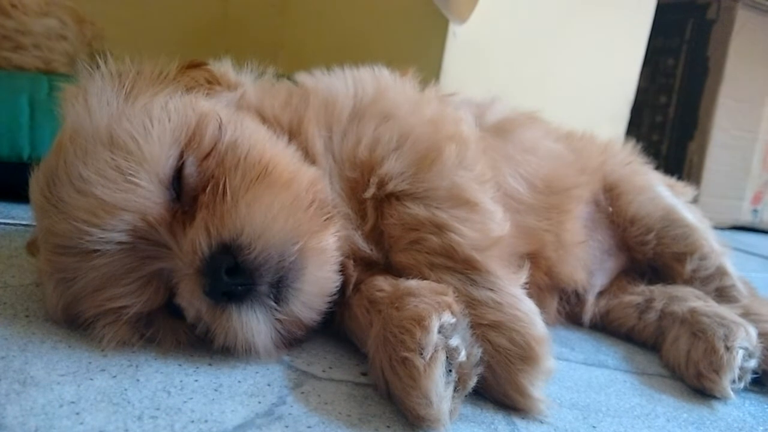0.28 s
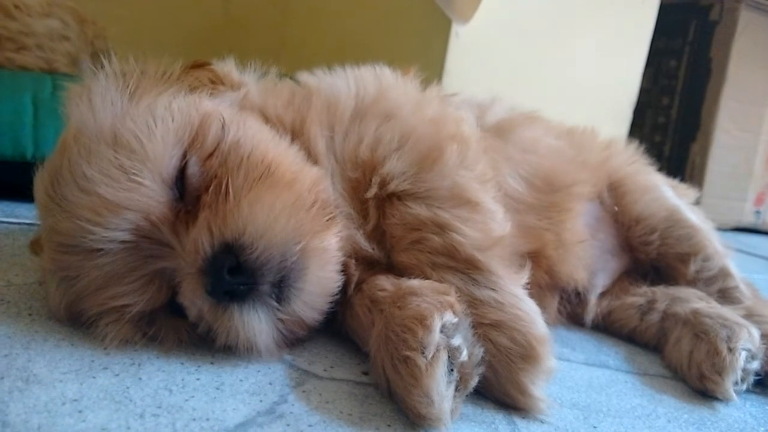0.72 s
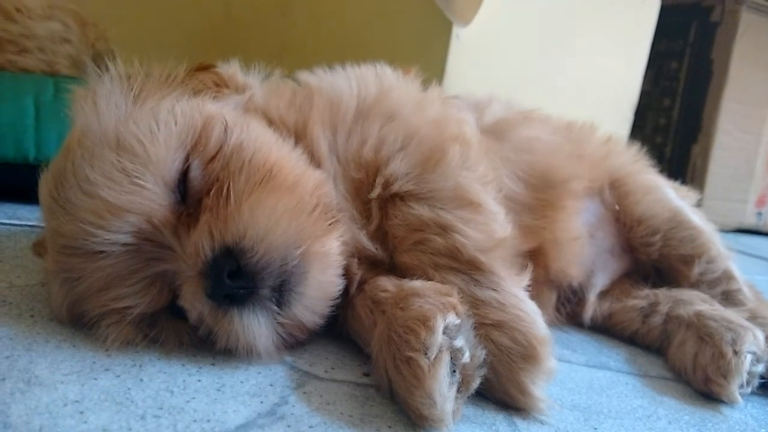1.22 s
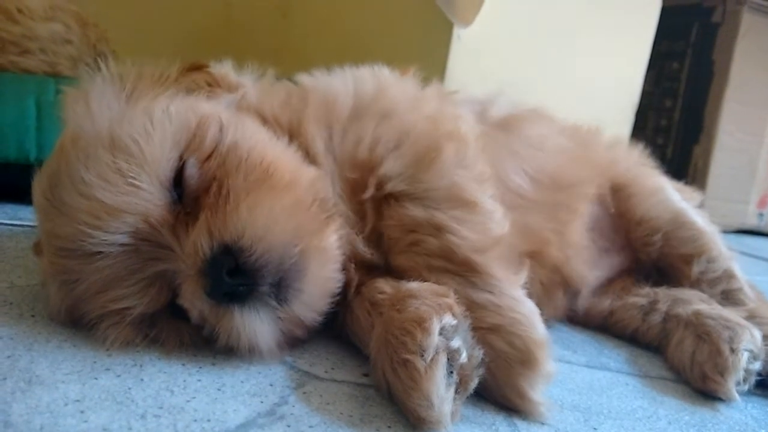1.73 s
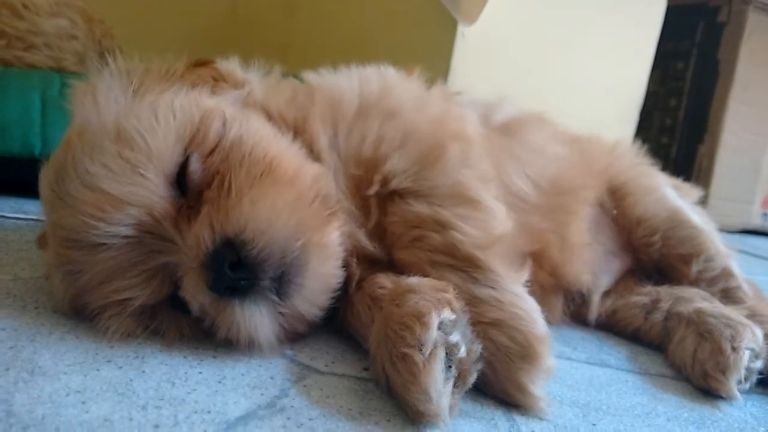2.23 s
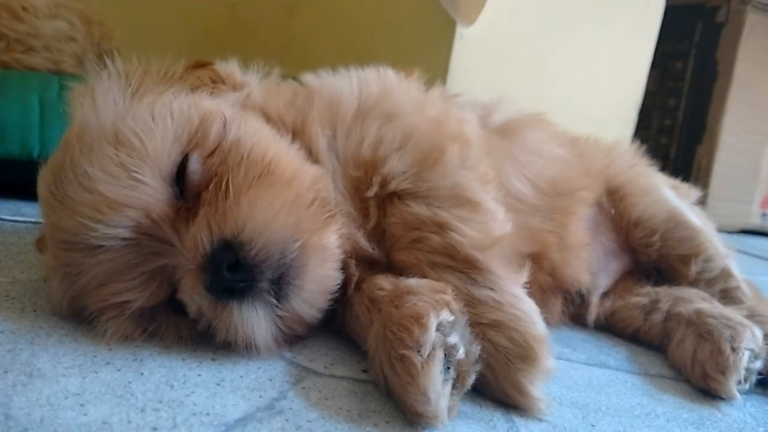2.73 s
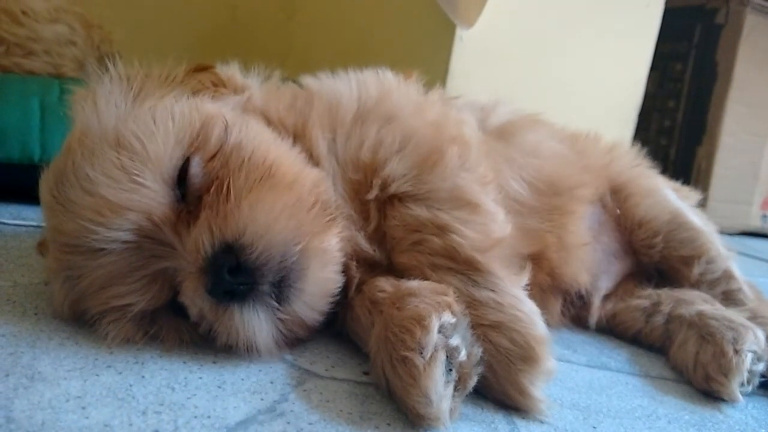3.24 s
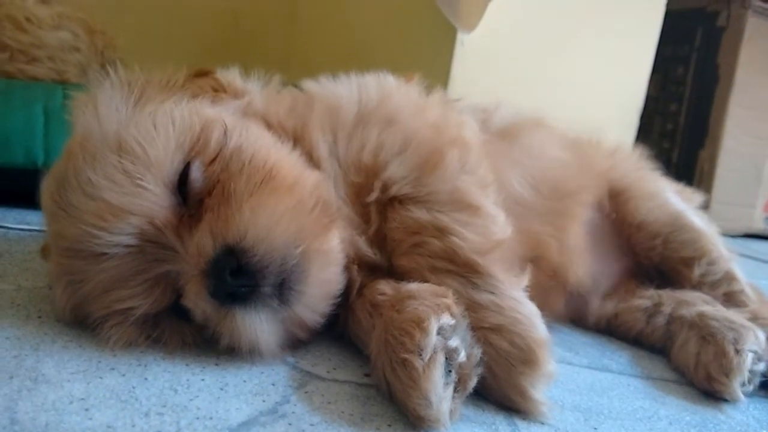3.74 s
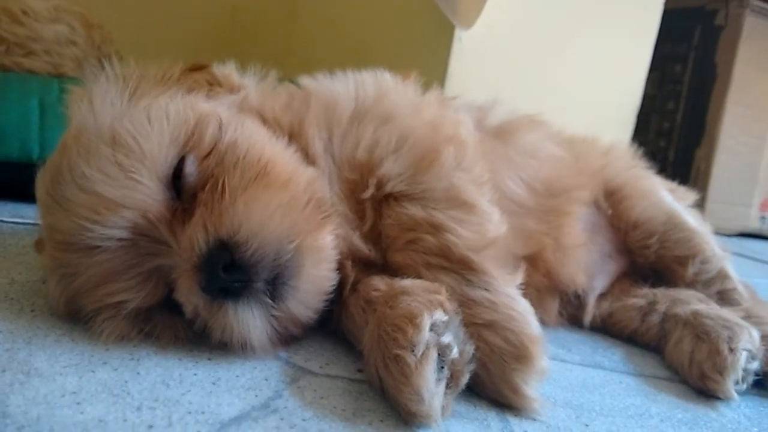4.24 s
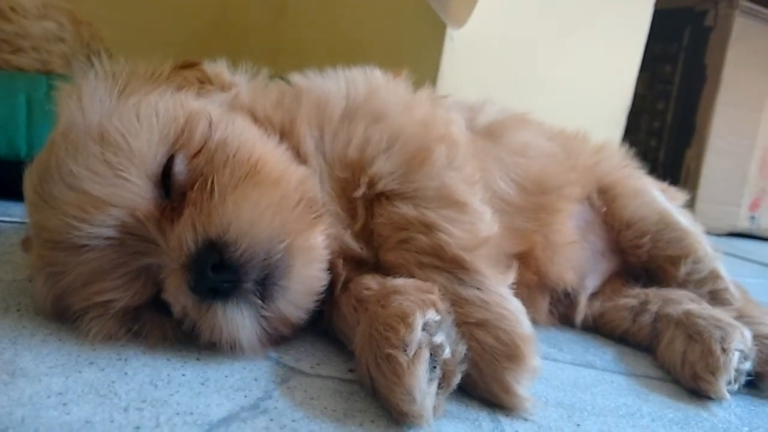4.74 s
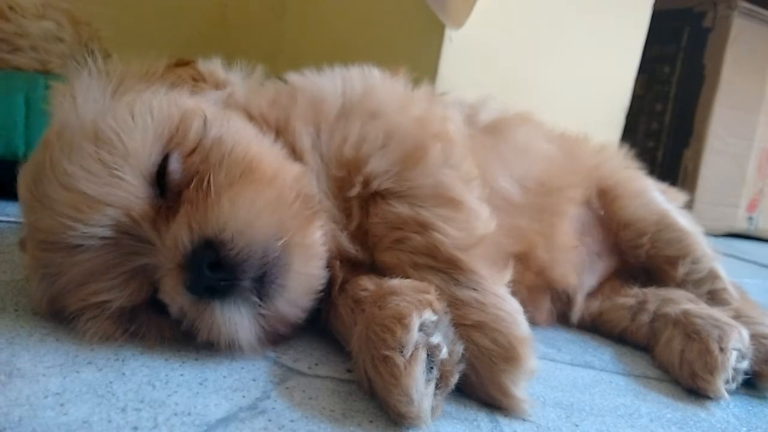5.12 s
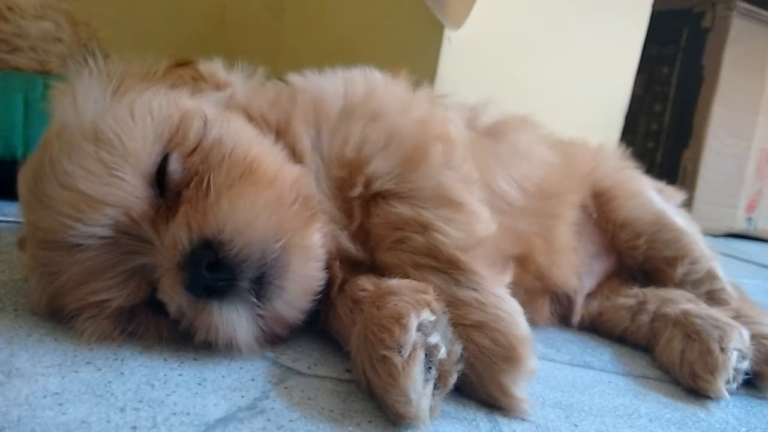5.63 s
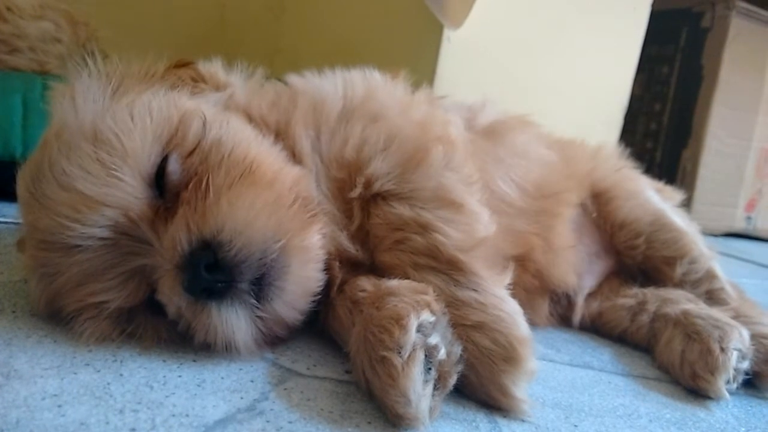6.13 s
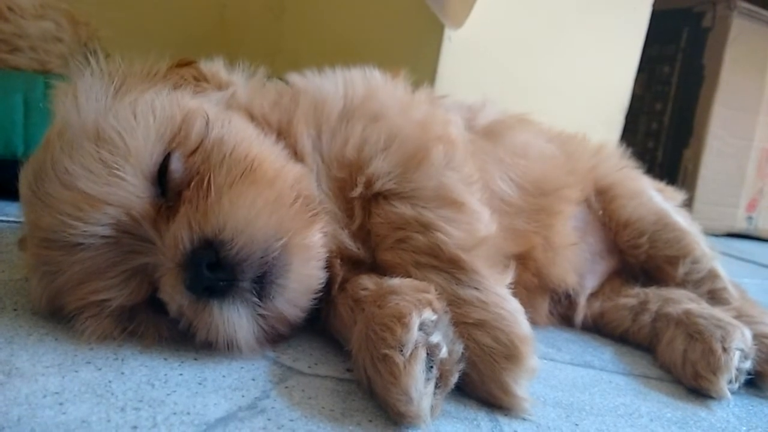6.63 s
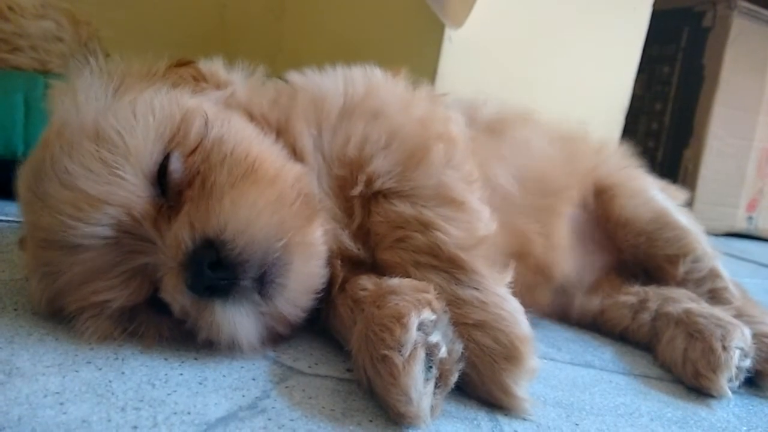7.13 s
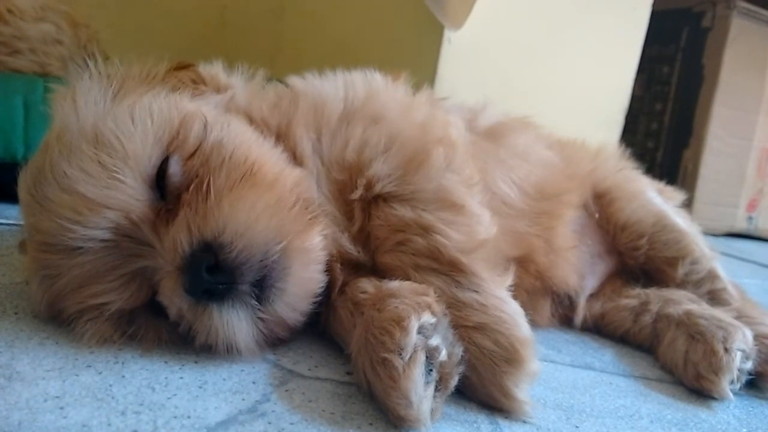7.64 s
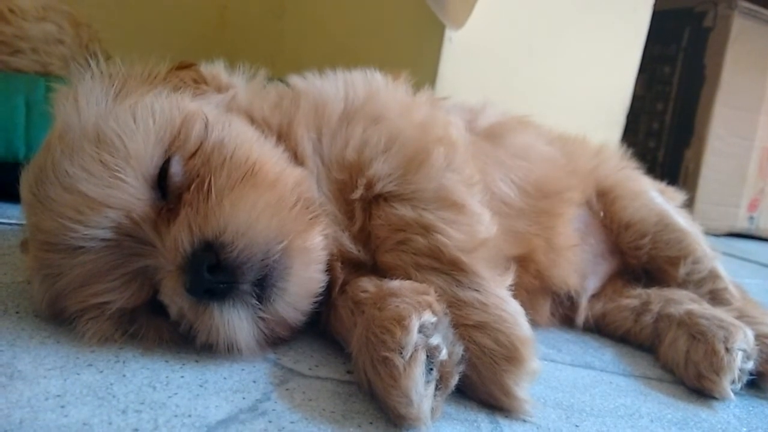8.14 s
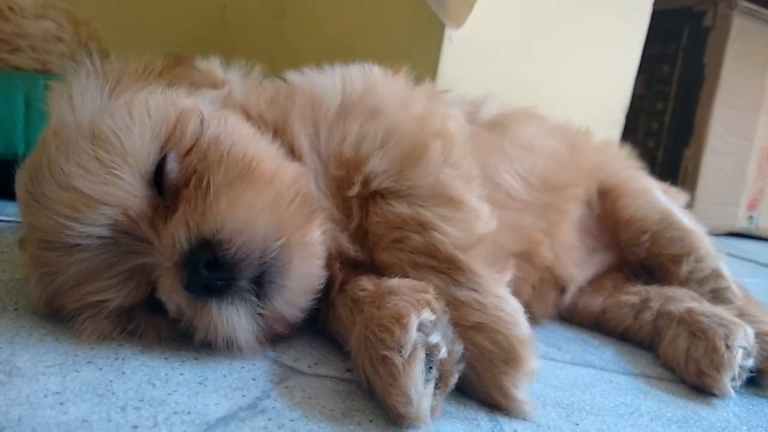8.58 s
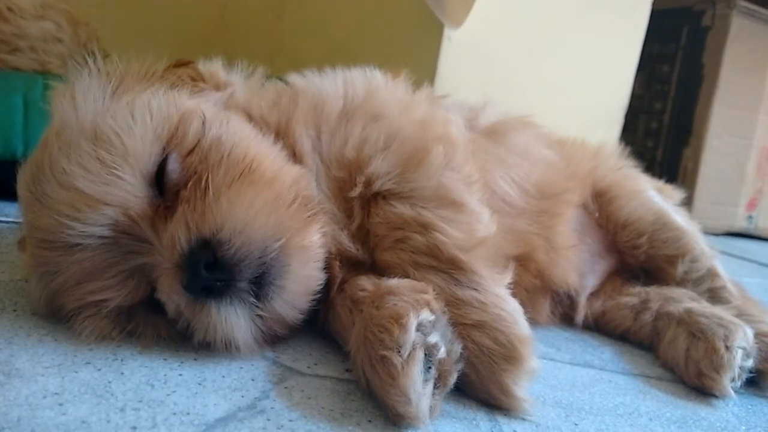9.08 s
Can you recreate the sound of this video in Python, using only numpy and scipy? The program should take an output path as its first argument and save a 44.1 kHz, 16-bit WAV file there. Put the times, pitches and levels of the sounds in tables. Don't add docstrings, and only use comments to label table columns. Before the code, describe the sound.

Quiet indoor background: low distant traffic, soft room hum, hiss and a fine high mechanical buzz that stops before three seconds. A puppy nearby creaks in its throat, yips strongly with a faint answer, then gives softer pairs of very short high squeaks, with small mouth clicks and whistly nasal breaths. Later yips grow loud and end with a single strongest one. Slight room echo follows; the background dips under the loud calls.

```python
import sys
import numpy as np
from scipy import signal
from scipy.fft import rfft, irfft, next_fast_len
from scipy.io import wavfile
from scipy.ndimage import uniform_filter1d

SR = 44100
rng = np.random.default_rng(int(sys.argv[2]) if len(sys.argv) > 2 else 0)


def level_to_linear(level):
    exponent = np.asarray(level, float) / 20
    return 10 ** exponent


def waveform_to_disk(signal):
    frames = np.transpose(np.atleast_2d(signal))
    scaled = np.clip(frames, -1, 1) * 32767
    samples = np.round(scaled).astype(np.int16)
    wavfile.write(sys.argv[1], SR, samples)


N = 412750
SIZE = next_fast_len(N + SR)
HZ = np.maximum(np.fft.rfftfreq(SIZE, 1 / SR), 1)
TIME = np.arange(N) / SR

# time in seconds, first partial in dB.
YIPS = [
    [(1.556, -36), (1.561, -17), (1.566, -21), (1.585, -15), (1.594, -24), (1.616, -23), (1.642, -40),
     (1.645, -33), (1.654, -36)],
    [(1.75, -55), (1.753, -41), (1.774, -33), (1.785, -44), (1.794, -36), (1.798, -35), (1.801, -28),
     (1.812, -30), (1.82, -40)],
    [(3.428, -65), (3.432, -32), (3.443, -39), (3.462, -34), (3.484, -26), (3.498, -30), (3.502, -27),
     (3.509, -29), (3.514, -45)],
    [(3.734, -43), (3.738, -22), (3.745, -23), (3.768, -42), (3.782, -36), (3.786, -39), (3.793, -33),
     (3.801, -34), (3.804, -37)],
    [(4.911, -61), (4.915, -31), (4.918, -39), (4.942, -34), (4.945, -31), (4.961, -28), (4.97, -31),
     (4.974, -30), (4.982, -38)],
    [(5.188, -45), (5.192, -21), (5.196, -20), (5.207, -32), (5.229, -20), (5.244, -17), (5.251, -19),
     (5.257, -13), (5.263, -18)],
    [(6.846, -61), (6.85, -30), (6.87, -30), (6.873, -23), (6.892, -11), (6.899, -13), (6.905, -11),
     (6.933, -19), (6.94, -38)],
    [(7.16, -43), (7.164, -22), (7.172, -20), (7.181, -26), (7.208, -29), (7.222, -25), (7.232, -16),
     (7.236, -27), (7.24, -41)],
    [(8.486, -50), (8.492, -16), (8.497, -15), (8.508, -26), (8.521, -10), (8.533, -7.5), (8.549, -9),
     (8.568, -17), (8.582, -34)],
]
# frequency in Hz, density in dB per Hz.
PUFF = [(2060, -103), (3500, -84.5), (3680, -43.5), (4050, -14.5), (4920, -20.5), (5480, -17), (6410, -5),
        (9720, -18), (11000, -3.5), (12500, -13), (13900, -15.5), (14600, -4.5), (15800, -30)]


def rms_one(x):
    return x / np.sqrt(np.mean(x ** 2) + 1e-20)


def at_hz(points, hz):
    known_hz, value = np.array(points)[:, 0], np.array(points)[:, 1]
    return np.interp(np.log(hz), np.log(known_hz), value)


def filtered(x, response):
    return irfft(rfft(x, SIZE) * response, SIZE)[..., :N]


def drift(rate):
    r = np.exp(-80 * np.pi * rate / SR)
    slow = signal.lfilter([1], [1, -2 * r, r * r], rng.standard_normal(N // 40 + 2002))[2000:]
    return np.interp(np.arange(N) / 40, np.arange(len(slow)), rms_one(slow))


def noise(spectrum, channels):
    return rms_one(filtered(rng.standard_normal((channels, N)), level_to_linear(at_hz(spectrum, HZ))))


def section(rows, fade_s=0.0008):
    s, *columns = np.transpose(rows)
    span = slice(round(s[0] * SR), round(s[-1] * SR))
    t = TIME[span]
    edge = np.clip(np.minimum(t - s[0], s[-1] - t) / fade_s, 0, 1)
    return span, [np.interp(t, s, c) for c in columns], edge


def struck(clicks, modes):
    out = 0
    for hz, level_db, t60 in modes:
        r, w = level_to_linear(-60 / (t60 * SR)), 2 * np.pi * hz / SR
        mode = [0, level_to_linear(level_db) * np.sin(w)], [1, -2 * r * np.cos(w), r * r]
        out = out + signal.lfilter(*mode, clicks + 1e-18)
    return out


def clicks_at(events):
    train = np.zeros(N)
    for s, peak_db in events:
        train[round(s * SR)] = level_to_linear(peak_db)
    return train


def peaked(t, rise, fall):
    return np.where(t < 0, rise * t, -fall * t)


def drone(start, end, from_hz, to_hz, level_db):
    along = np.clip((TIME - start) / (end - start), 0, 1)
    hz = (from_hz + (to_hz - from_hz) * along) * (1 + .012 * drift(4))
    tone = np.sin(2 * np.pi * np.cumsum(hz) / SR)
    return level_to_linear(level_db + 3 + 1.5 * drift(5)) * tone * np.sin(np.pi * along) ** .5


def background():
    # time in seconds, gain in dB.
    settling = [(0, 0), (2.3, -1.5), (2.9, -0.5), (4.5, -2.5), (5.5, -3), (6.7, -4), (9.36, -2.5)]
    # time in seconds, half length in seconds, rise of the rumble in dB.
    passes = [
        (.7, .3, 2.5),
        (1.61, 0.53, 7),
        (2.593, 0.23, 6),
        (3.11, 0.13, 4),
        (4.4, 0.53, 1),
        (5.095, 0.42, 9),
        (5.652, 0.11, 1),
        (9.36, 0.073, 9.5),
    ]
    # frequency in Hz, density in dB per Hz.
    rumble_spectrum = [(18, -48.5), (30, -10.5), (59, 2.5), (75, 3), (91, -25), (110, -13), (140, -37.5),
                       (240, -120)]
    room_spectrum = [(47, -41.5), (80, -10.5), (118, 1.5), (158, -9), (210, -2.5), (245, -9.5), (310, -7),
                     (402, -6.5), (515, -8), (611, -12.5), (1800, -49.5), (2340, -52), (3960, -120)]
    hiss_spectrum = [(700, 4), (1500, 2.5), (2500, 1.5), (4000, -0.5), (7000, -3), (10000, -3.5),
                     (13000, -5.5), (14600, -5), (15600, -4)]
    # start in seconds, end in seconds, first Hz, last Hz, level in dB.
    engines = [(.15, 1.0, 47, 46.4, -41), (4.95, 5.28, 47.8, 47.7, -43), (5.38, 5.9, 46.6, 46, -38),
               (6.15, 6.85, 39.6, 41.3, -48), (5.9, 6.15, 101, 112, -47), (6.25, 6.72, 122, 126, -44),
               (7.35, 8.5, 116, 110, -50), (2.8, 3.2, 215, 213, -49), (8.2, 8.7, 305, 335, -48),
               (9.05, 9.25, 325, 312, -50), (8.8, 9.2, 440, 540, -52), (8.1, 8.4, 540, 520, -51),
               (.05, .4, 445, 445, -53), (.2, .55, 142, 136, -51), (1.7, 1.95, 345, 345, -51),
               (2.3, 2.75, 400, 350, -53), (4.1, 4.5, 300, 300, -55)]
    gain_db = np.interp(TIME, *np.transpose(settling))
    passing_db = sum(rise_db * np.exp(-((TIME - s) / half) ** 2) for s, half, rise_db in passes)
    sway_db = 1.5 * drift(4)
    first, second = noise(rumble_spectrum, channels=2)
    lag_s, coherence = .007, .7
    late = coherence * np.roll(first, round(lag_s * SR)) + np.sqrt(1 - coherence ** 2) * second
    rumble = level_to_linear(-48 + passing_db + sway_db) * np.array([first, late])
    shared, own = noise(room_spectrum, channels=1), noise(room_spectrum, channels=2)
    stir_db = drift(4.8) + .8 * drift(1.2)
    room = level_to_linear(-44.5 + 0.94 * gain_db + stir_db) * (0.65 * shared + 0.63 * own)
    hiss = level_to_linear(-54.5 + gain_db) * noise(hiss_spectrum, channels=2) * level_to_linear([[-1.5], [1.5]])
    drones = sum(drone(*row) for row in engines)
    return (rumble + room) * level_to_linear([[-1.2], [1.2]]) + drones * [[.2], [1]] + hiss


def motor():
    # start in seconds, end in seconds, level in dB.
    runs = [(0, .12, -55), (0.13, .21, -55.5), (0.22, 0.342, -55), (0.604, 0.65, -56), (0.69, 0.765, -56),
            (0.785, 0.896, -56), (0.94, 1.006, -56), (1.02, 1.074, -55.5), (1.102, 1.158, -54.5),
            (1.163, 1.635, -55), (1.67, 1.852, -55.5), (1.86, 2.789, -53.5)]
    # frequency in Hz, density in dB per Hz.
    barrel = [(4500, -20.5), (6500, -13), (9200, -10), (10700, -13.5), (11300, -9), (12000, -10.5),
              (12800, -1.5), (13900, -19.5)]
    step_hz = 125.0
    t = TIME[:3 * SR]
    harmonics = range(88, 110)
    kicks = rms_one(sum(np.cos(2 * np.pi * k * step_hz * t + .02 * k * k) for k in harmonics))
    rattle = rng.standard_normal((2, len(t))) * (.5 + np.exp(-(t * step_hz % 1) / 1.3))
    running = sum(level_to_linear(level_db) * ((t > start) & (t < end)) for start, end, level_db in runs)
    load = uniform_filter1d(running, size=900) * level_to_linear(1.5 * drift(14)[:len(t)])
    buzz = rms_one(filtered(.2 * kicks + rattle, level_to_linear(at_hz(barrel, HZ)))[:, :len(t)]) * load
    return np.pad(buzz * level_to_linear([[-3], [3]]), [(0, 0), (0, N - len(t))])


def electronics():
    # frequency in Hz, level in dB.
    whine_tones = [(6960, -72), (15000, -89.5)]
    readout_hz = 15.2
    whines = sum(level_to_linear(level_db) * np.sin(2 * np.pi * hz * TIME) for hz, level_db in whine_tones)
    decay = np.exp(-((TIME + .025) * readout_hz % 1) / .2)
    bursts = rng.standard_normal((2, N)) * (.15 + decay)
    crackle = level_to_linear(-70.5) * rms_one(struck(bursts, [(13970, 0, 0.00301)]))
    return whines * [[.3], [1]] + crackle


def ticks():
    # time in seconds, peak in dB.
    body_ticks = [(1.0221, -36), (1.839, -32), (3.6845, -39), (3.7232, -35), (3.8142, -32.5), (3.8558, -41),
                  (7.2428, -32.5), (5.446, -45), (5.5099, -38), (5.5397, -41), (5.6221, -41), (5.6486, -43),
                  (5.7244, -42), (5.7458, -41), (5.8207, -38), (5.9857, -39), (6.097, -41), (6.4594, -41)]
    body = [(13000, 2, 0.003), (11200, 1.5, 0.0045), (8450, -3, 0.0032)]
    return level_to_linear(-2.5) * struck(clicks_at(body_ticks), body)


def creak():
    # time in seconds, peak in dB.
    flaps = [(1.3926, -19.5), (1.4002, -21), (1.4038, -21.5), (1.4062, -18), (1.4131, -16), (1.4178, -24),
             (1.4201, -21.5), (1.4274, -19.5), (1.4337, -21.5), (1.4399, -29.5), (1.4442, -32),
             (1.4494, -28), (1.4556, -21.5), (1.4647, -22), (1.4715, -19.5), (1.4764, -30), (1.4915, -34),
             (1.5011, -19.5), (1.5045, -30), (1.5069, -16), (1.5379, -14), (1.5434, -18), (1.7985, -27),
             (1.8065, -26.5), (5.1405, -34.5), (5.1465, -28.5)]
    # frequency in Hz, level in dB, t60 in seconds.
    throat = [(437, 1, 0.0067), (1900, -10, 0.0047), (229.4, -24, 0.0079), (744, -27.5, 0.036)]
    ramp = np.linspace(0, 1, round(0.0012 * SR))
    push = np.append(-1.25 * ramp / ramp.sum(), signal.windows.hann(20) / 10)
    return level_to_linear(6.0) * np.convolve(struck(clicks_at(flaps), throat), push)[:N]


def yips():
    # time in seconds, pitch in Hz.
    tensions = [
        [(1.556, 718), (1.573, 793), (1.595, 1165), (1.616, 1275), (1.635, 1430), (1.64, 1480), (1.646, 1547),
         (1.654, 1400)],
        [(1.75, 1064), (1.765, 1161), (1.778, 1170), (1.794, 1253), (1.797, 1291), (1.803, 1540), (1.813, 1698),
         (1.82, 1718)],
        [(3.428, 1140), (3.447, 1238), (3.457, 1241), (3.479, 1494), (3.485, 1604), (3.494, 1446),
         (3.511, 1234), (3.514, 1200)],
        [(3.734, 875), (3.743, 901), (3.755, 1111), (3.775, 1238), (3.778, 1213), (3.79, 1330), (3.796, 1703),
         (3.804, 1788)],
        [(4.911, 1237), (4.918, 1193), (4.946, 1291), (4.957, 1401), (4.964, 1624), (4.972, 1616),
         (4.975, 1673), (4.982, 1584)],
        [(5.188, 874), (5.196, 882), (5.205, 1104), (5.233, 1267), (5.24, 1465), (5.248, 1532), (5.257, 1790),
         (5.263, 1683)],
        [(6.846, 1132), (6.863, 1186), (6.868, 1253), (6.884, 1313), (6.898, 1528), (6.912, 1597),
         (6.933, 1262), (6.94, 1035)],
        [(7.16, 834), (7.17, 847), (7.182, 1103), (7.205, 1220), (7.218, 1370), (7.228, 1712), (7.231, 1696),
         (7.24, 1454)],
        [(8.486, 931), (8.496, 920), (8.504, 1151), (8.537, 1347), (8.547, 1460), (8.557, 1600), (8.575, 1310),
         (8.582, 1250)],
    ]
    # time in seconds, second partial in dB, third partial in dB.
    closures = [
        [(1.556, -60, -66), (1.561, -26, -37), (1.574, -46, -58), (1.603, -44, -65), (1.635, -26, -63),
         (1.641, -47, -71), (1.654, -38, -69)],
        [(1.75, -69, -70), (1.753, -65, -70), (1.758, -36, -70), (1.781, -43, -70), (1.797, -44, -70),
         (1.806, -68, -70), (1.82, -68, -70)],
        [(3.428, -69, -70), (3.433, -37, -70), (3.454, -26, -70), (3.465, -23, -54), (3.483, -45, -72),
         (3.507, -31, -69), (3.514, -48, -70)],
        [(3.734, -64, -66), (3.738, -39, -45), (3.745, -31, -50), (3.757, -36, -72), (3.78, -28, -69),
         (3.793, -42, -70), (3.804, -72, -70)],
        [(4.911, -73, -70), (4.918, -47, -70), (4.943, -30, -69), (4.946, -31, -59), (4.951, -31, -63),
         (4.954, -33, -70), (4.982, -62, -70)],
        [(5.188, -63, -66), (5.194, -26, -43), (5.211, -40, -71), (5.234, -30, -60), (5.239, -35, -45),
         (5.249, -38, -52), (5.263, -61, -75)],
        [(6.846, -72, -70), (6.865, -49, -71), (6.879, -24, -44), (6.915, -34, -47), (6.924, -46, -72),
         (6.934, -26, -70), (6.94, -36, -58)],
        [(7.16, -52, -69), (7.173, -49, -69), (7.182, -66, -73), (7.216, -37, -61), (7.225, -63, -48),
         (7.229, -44, -51), (7.24, -74, -70)],
        [(8.486, -71, -61), (8.493, -44, -53), (8.499, -51, -73), (8.513, -42, -42), (8.521, -20, -52),
         (8.534, -19, -39), (8.575, -50, -70), (8.582, -54, -70)],
    ]
    # time in seconds, level in dB.
    strains = [
        [(1.556, -64), (1.582, -73), (1.654, -69)],
        [(1.75, -73), (1.804, -73), (1.82, -73)],
        [(3.428, -73), (3.462, -63), (3.475, -72), (3.514, -77)],
        [(3.734, -74), (3.76, -63), (3.775, -74), (3.804, -74)],
        [(4.911, -73), (4.967, -73), (4.982, -66)],
        [(5.188, -80), (5.248, -64), (5.263, -76)],
        [(6.846, -74), (6.874, -71), (6.881, -51), (6.888, -51), (6.899, -41), (6.902, -46), (6.909, -40),
         (6.94, -69)],
        [(7.16, -75), (7.205, -70), (7.224, -53), (7.24, -64)],
        [(8.486, -74), (8.502, -72), (8.513, -37), (8.544, -43), (8.548, -40), (8.568, -56), (8.571, -52),
         (8.582, -61)],
    ]
    # frequency in Hz, level in dB.
    muzzle = [(2000, -8), (3200, -8), (4200, -8), (5000, -7), (6300, -4), (8000, -8), (9800, -20),
              (11000, -10), (12500, -20), (14000, -12), (16000, -30)]
    out, waver, air = np.zeros(N), drift(180), noise(PUFF, channels=1)[0]
    for rows, tension, closure, strain in zip(YIPS, tensions, closures, strains):
        span, (level_db,), edge = section(rows)
        _, (hz,), _ = section(tension)
        _, (second_db, third_db), _ = section(closure)
        _, (strain_db,), _ = section(strain)
        hz = uniform_filter1d(hz, size=100) * (1 + .001 * waver[span])
        turn = 2 * np.pi * np.cumsum(hz) / SR
        call = level_to_linear(uniform_filter1d(level_db, size=40)) * np.sin(turn)
        for k in range(2, 13):
            shake = np.roll(waver, 900 * k)[span]
            if k == 2:
                partial_db = second_db
            elif k == 3:
                partial_db = third_db
            else:
                partial_db = strain_db + 4 + at_hz(muzzle, k * hz)
            partial_db = uniform_filter1d(partial_db, size=100) + min(k - 1, 2) * shake
            call += level_to_linear(partial_db) * np.sin(k * turn + k * k + .08 * k * shake[::-1])
        call += level_to_linear(strain_db - 10) * air[span] * (1 + np.sin(turn))
        out[span] = 2 * edge * call
    return out


def pops():
    burst_db = [-27, -50, -27, -28, -29, -29, -36, -42, -40]
    # frequency in Hz, level in dB, t60 in seconds.
    pop_modes = [(1300, 3, 0.014), (2580, -18, .008)]
    starts = [(rows[0][0] + .0025, pop_db) for rows, pop_db in zip(YIPS, burst_db)]
    return np.convolve(struck(clicks_at(starts), pop_modes), signal.windows.hann(16) / 7)[:N]


def smacks():
    # time in seconds, peak in dB.
    partings = [
        (1.6427, -34),
        (1.7994, -43),
        (3.4814, -31),
        (4.9774, -35),
        (5.2397, -26),
        (5.2472, -27),
        (7.2425, -38),
    ]
    mouth = [(6550, -3.5, 0.0054), (11700, -10, 0.00053), (15100, -7.0, 0.001),
             (3670, -12.5, 0.011), (8300, 8.0, 0.0005), (727, 10.0, 0.0055)]
    return level_to_linear(2) * struck(clicks_at(partings), mouth)


def nose():
    # peak in seconds, peak in dB, fading in dB per second.
    puffs = [
        (1.653, -51, 70),
        (1.838, -56, 60),
        (3.484, -48.5, 132),
        (3.81, -59, 206),
        (4.993, -50.5, 198),
        (5.262, -52, 132),
        (6.904, -33.5, 331),
        (7.244, -49, 300),
        (8.55, -32, 338.5),
    ]
    # peak in seconds, peak in Hz, peak in dB, sag after it in Hz per second.
    whistles = [
        (1.658, 13650, -43, 8000),
        (3.492, 14100, -42, 90000),
        (3.818, 14600, -54, 40000),
        (4.981, 13900, -33, 15000),
        (6.92, 14750, -34, 114000),
        (8.568, 14600, -37.5, 25000),
    ]
    air, out, waver = noise(PUFF, channels=1)[0], np.zeros(N), drift(300)
    for s, peak_db, fading in puffs:
        span, _, edge = section([(s - .03,), (s + 0.11,)], fade_s=.01)
        puff_db = peak_db + peaked(TIME[span] - s, 1198.5, fading) + 3.0 + 2.4 * waver[span]
        out[span] += level_to_linear(puff_db) * edge * air[span]
    rise_db_per_s, hold_s, fall_db_per_s, climb_hz_per_s = 4500, .009, 3200, 30000
    for s, top_hz, peak_db, sag in whistles:
        span, _, edge = section([(s - .016,), (s + .024,)])
        t = TIME[span] - s
        hz = top_hz + peaked(t, climb_hz_per_s, sag)
        level_db = peak_db + rise_db_per_s * np.minimum(t, 0) - fall_db_per_s * np.maximum(t - hold_s, 0)
        hz = uniform_filter1d(hz, size=200) * (1 + 0.0045 * waver[span])
        turn = 2 * np.pi * np.cumsum(hz) / SR
        lower = level_to_linear(-9.0 + 1.6 * waver[::-1][span]) * np.sin(0.794 * turn)
        out[span] += level_to_linear(level_db + 12.5) * edge * (np.sin(turn) + lower)
    return out


def taps():
    # time in seconds, peak in dB.
    touches = [
        (2.3255, -31),
        (4.43, -43),
        (5.819, -39),
    ]
    # frequency in Hz, level in dB, t60 in seconds.
    carpet = [(684, -2, 0.016), (1080, -1.5, 0.009), (1310, -12, 0.018)]
    return struck(clicks_at(touches), carpet)


def swell(start, end, hz, width_hz, level_db):
    band = filtered(rng.standard_normal(N), 1 / (1 + (2 * (HZ - hz) / width_hz) ** 2))
    band = band / np.std(band[(TIME > start) & (TIME < end)])
    along = np.clip((TIME - start) / (end - start), 0, 1)
    return level_to_linear(level_db) * band * np.sin(np.pi * along) ** .5


def near(x):
    # frequency in Hz, left over right in dB, left lead in
    side_balance = [(700, 8, 1.6), (920, 19, .6), (1100, 6, .4), (1320, 0, .5), (1400, -4, .7), (1510, -14, 1.9),
                    (1620, -6, 2.9), (1720, -1, 3.1), (1950, -6, 3), (2250, 2, 2.9), (2450, -3, 2.9),
                    (2600, -5, 2.7), (2800, -11, 1.4), (3000, -4, 0), (3200, 0, 0), (3800, 1, -.3),
                    (4250, -9, -1.5), (4600, -3, -3.3), (5500, -2, -6.8), (6300, -4, -7.4), (7200, -9, -11),
                    (8000, -6, -12.3), (10600, -12, -20.3), (13200, -12, -25.2), (14100, -8, -25.8),
                    (16000, -8, -29)]
    hz, balance_db, lead = np.transpose(side_balance)
    bass = np.minimum(HZ / hz[0], 1)
    ratio = level_to_linear(np.interp(HZ, hz, balance_db) * bass)
    lead = np.interp(HZ, hz, lead) * bass
    sides = np.array([ratio * np.exp(1j * lead), 1 + 0 * HZ])
    return filtered(x, sides / np.sqrt(1 + ratio ** 2))


def reverb(x, longer, wider):
    # frequency in Hz, t60 in seconds.
    decay_times = [(300, 1), (1300, 0.47), (3000, 0.75), (6000, 0.18), (14000, .2)]
    # frequency in Hz, level in dB.
    colour = [(500, -1), (900, -3), (1250, -1), (1550, -.5), (2000, -3), (2700, -11), (3300, -6),
              (5000, -14), (16000, -34)]
    response = np.zeros((2, len(HZ)), complex)
    per_s = -np.log(1000) / (longer * at_hz(decay_times, HZ)) - 2j * np.pi * HZ
    for k, lag in enumerate(wider * rng.uniform(0.01, 0.03, size=14)):
        loop = np.exp(per_s * lag)
        response[k % 2] += (-1) ** (k // 2) * loop / (1 - loop)
    return filtered(x, response * level_to_linear(at_hz(colour, HZ)))


def ducking(x, knee_db, release_db_s):
    level_db = 10 * np.log10(uniform_filter1d(x ** 2, size=400) + 1e-12)
    over_db = np.maximum(level_db - knee_db, 0)
    held_db = np.maximum.accumulate(over_db + release_db_s * TIME) - release_db_s * TIME
    return level_to_linear(-.5 * uniform_filter1d(held_db, size=400))


def widened(pair):
    # frequency in Hz, share as a ratio.
    share = [(100, 0.011), (700, 0.066), (1200, 0.53), (2300, 0.48), (4800, 0.22), (7500, 0.26),
             (12500, 0.13), (16000, .3)]
    lag_s, turn_rad = .00039, .83
    phase = 2 * np.pi * HZ * lag_s + turn_rad * HZ / (HZ + 200)
    cross = -at_hz(share, HZ) * np.exp(-1j * phase)
    return pair + filtered(pair[::-1], cross)


def scene():
    # start in seconds, end in seconds, centre in Hz, width in Hz, level in dB.
    wheeze = (7.42, 7.9, 3230, 250, -64)
    puppy = creak() + yips() + pops() + smacks() + nose() + taps() + swell(*wheeze)
    corner = level_to_linear(-26.5) * reverb(puppy, longer=0.6, wider=1.8)
    hall = level_to_linear(-32.5) * reverb(puppy, longer=1.85, wider=3.2)
    gain = ducking(puppy, knee_db=-13.5, release_db_s=11.0)
    steady = background() + motor() + electronics()
    return near(puppy + ticks()) + widened(corner + hall + gain * steady)


def band_limit(x):
    return signal.sosfilt(signal.butter(12, 16040, fs=SR, output="sos"), x)


def record(dry):
    # low Hz, high Hz, margin in dB, loudest masking in dB over usual.
    dropped = [(2050, 2300, -7, 30), (2300, 2600, -7, 5), (4350, 4700, -3.5, 5), (4700, 5200, -4, 5)]
    top_hz = [14600, 15150, 15600, 16100]
    hz, _, (mid, side) = signal.stft([dry[0] + dry[1], dry[0] - dry[1]], SR, nperseg=1024)
    whole = uniform_filter1d(np.sum(abs(mid) ** 2, axis=0), size=3)
    for low, high, margin_db, cap_db in dropped:
        band = (hz > low) & (hz < high)
        powers = np.sum(abs(np.array([mid[band], side[band]])) ** 2, axis=1)
        mid_power, side_power = uniform_filter1d(powers, size=3)
        masking = np.minimum(side_power, level_to_linear(2 * cap_db) * np.median(side_power))
        drowned = np.minimum(level_to_linear(2 * -41) * whole, 5 * np.median(mid_power))
        mid[band] *= mid_power > np.maximum(level_to_linear(2 * margin_db) * masking, drowned)
    treble = np.sum(abs(side[hz > top_hz[0]]), axis=0)
    wander = uniform_filter1d(rng.standard_normal(mid.shape[1]), size=4)
    step = np.digitize(wander, [-.55, .15])
    bright = treble > 1.6 * np.median(treble)
    kept = hz[:, None] < np.take(top_hz, np.where(bright, 3, step))
    mid, side = signal.istft([mid * kept, side * kept], SR, nperseg=1024)[1][:, :N]
    return band_limit(np.array([mid + side, mid - side]) / 2)


dry = scene()
out = record(dry)
waveform_to_disk(out)
```